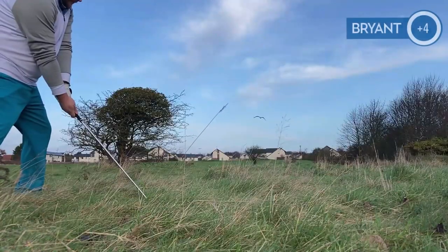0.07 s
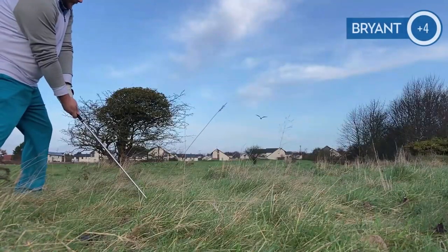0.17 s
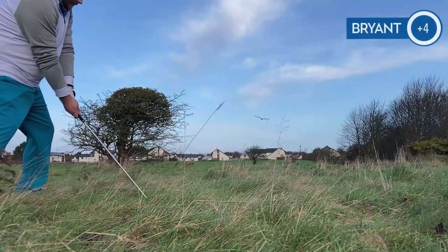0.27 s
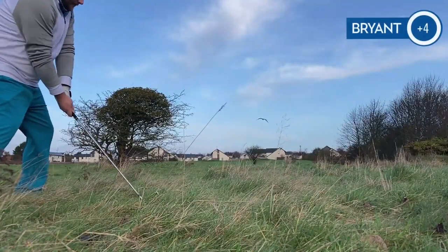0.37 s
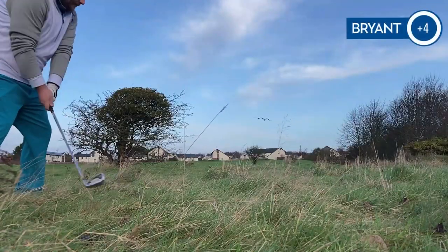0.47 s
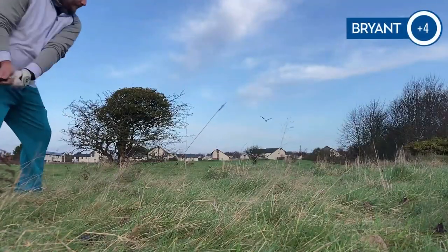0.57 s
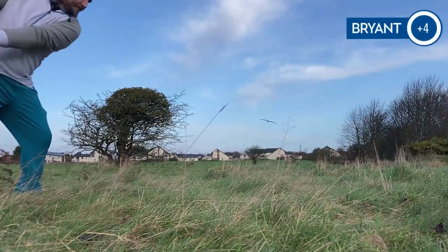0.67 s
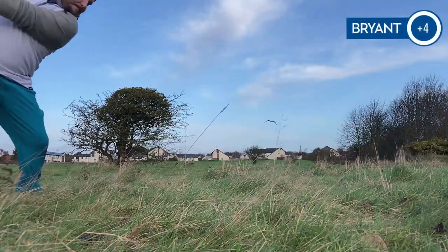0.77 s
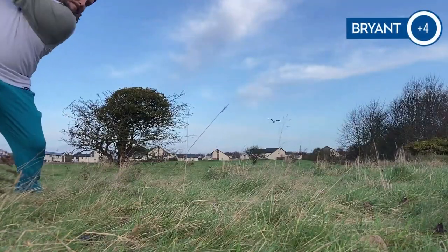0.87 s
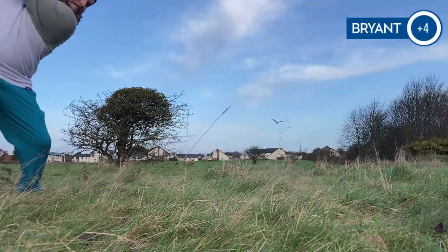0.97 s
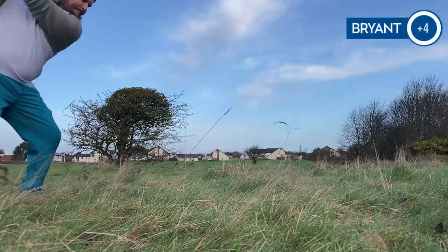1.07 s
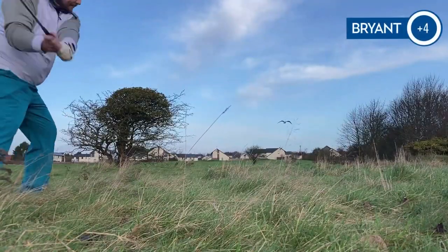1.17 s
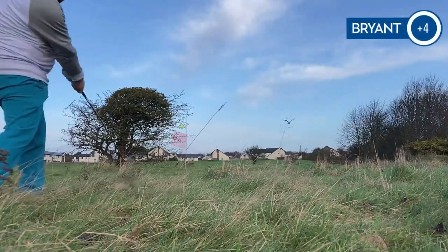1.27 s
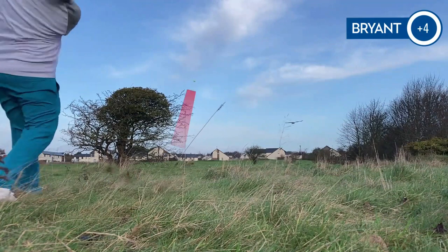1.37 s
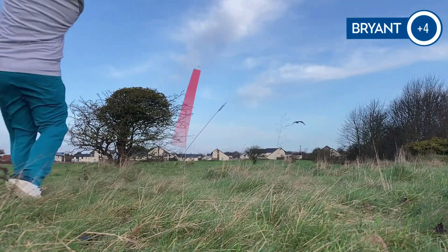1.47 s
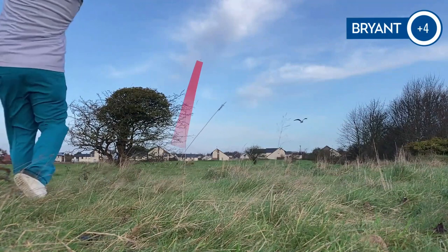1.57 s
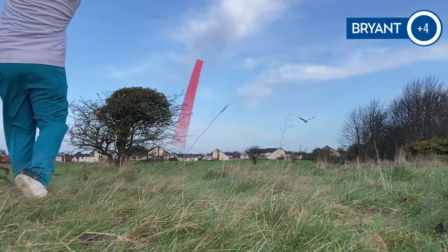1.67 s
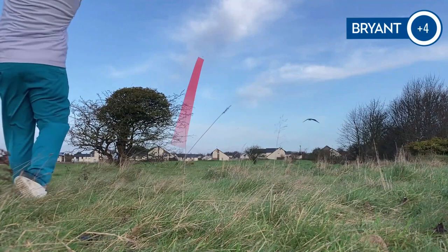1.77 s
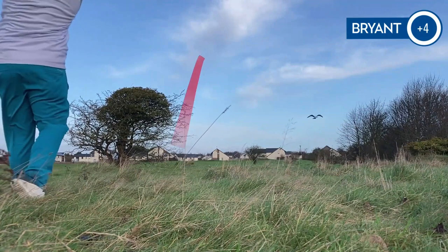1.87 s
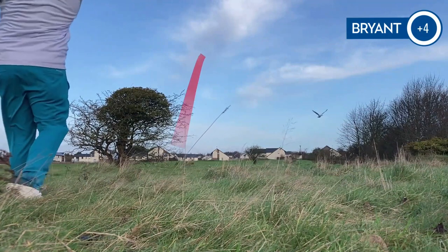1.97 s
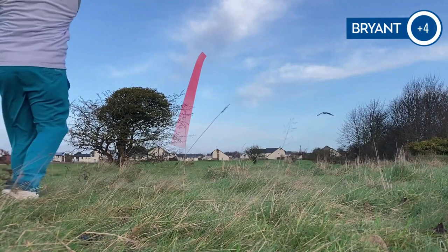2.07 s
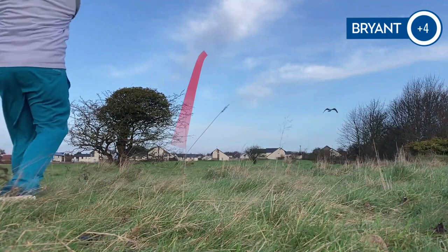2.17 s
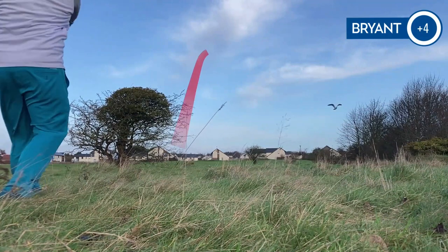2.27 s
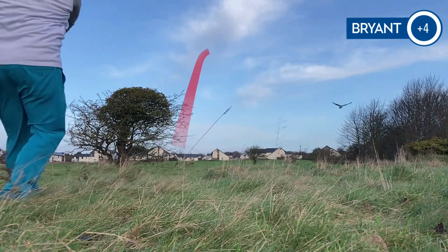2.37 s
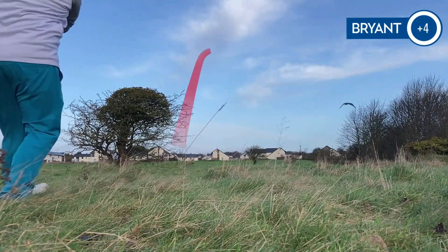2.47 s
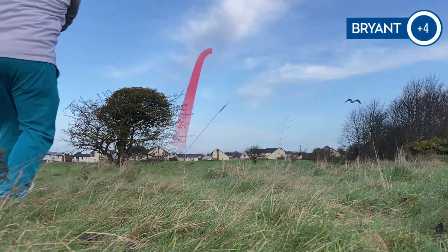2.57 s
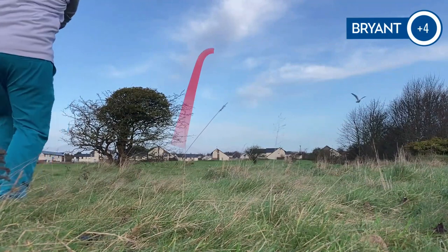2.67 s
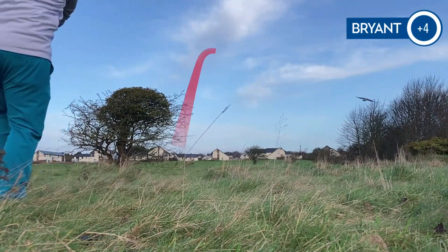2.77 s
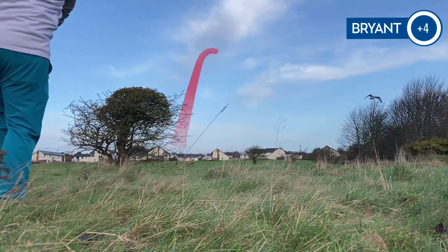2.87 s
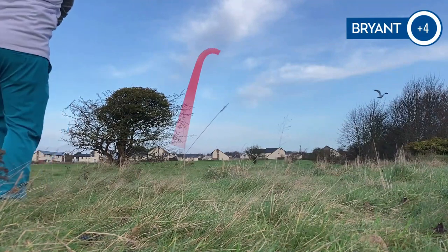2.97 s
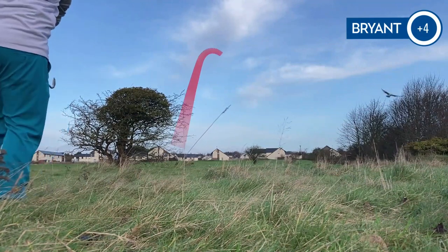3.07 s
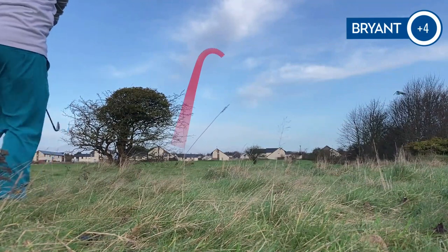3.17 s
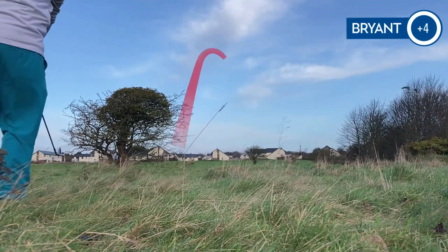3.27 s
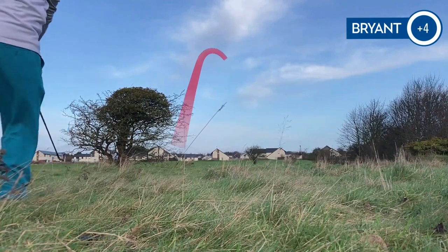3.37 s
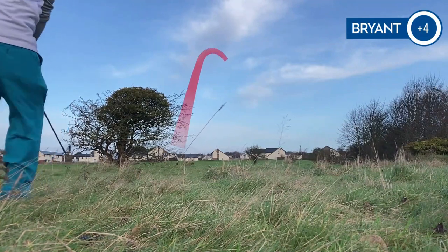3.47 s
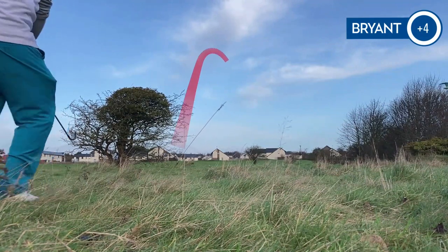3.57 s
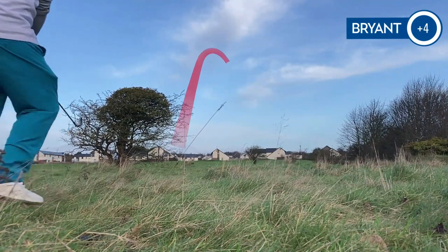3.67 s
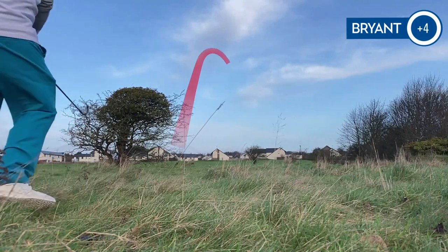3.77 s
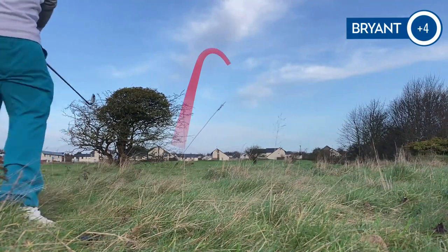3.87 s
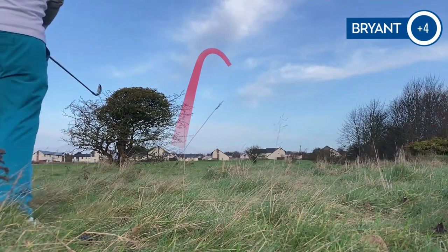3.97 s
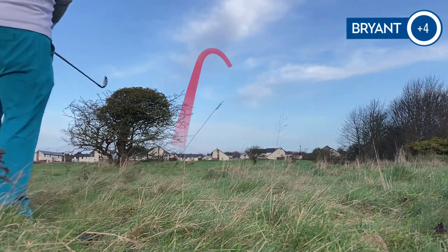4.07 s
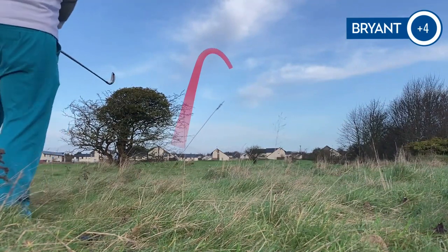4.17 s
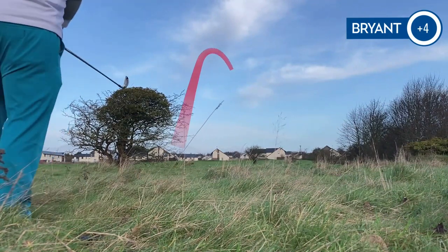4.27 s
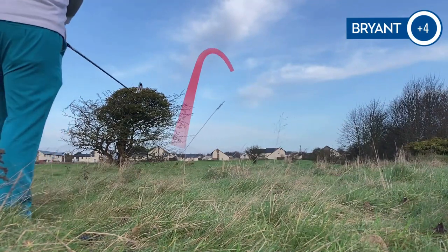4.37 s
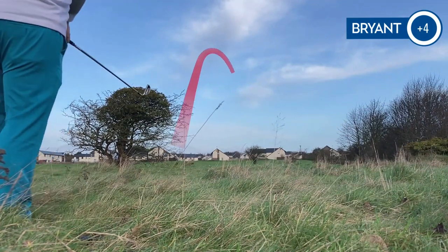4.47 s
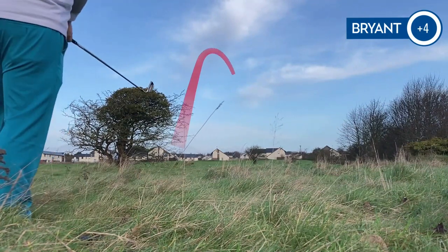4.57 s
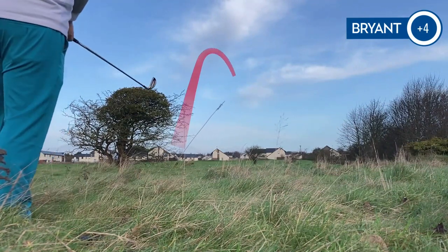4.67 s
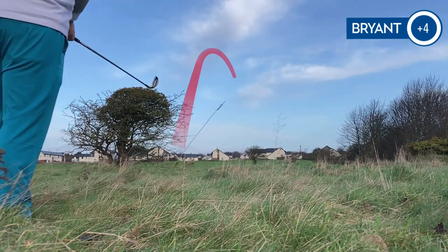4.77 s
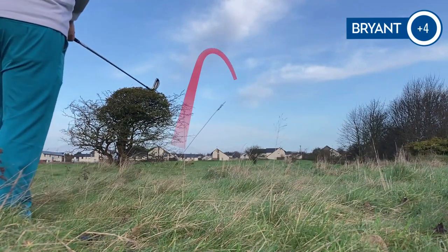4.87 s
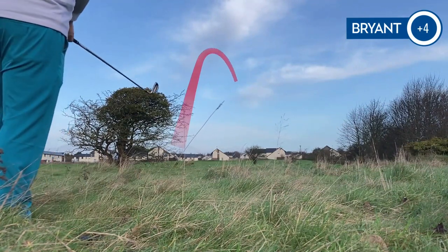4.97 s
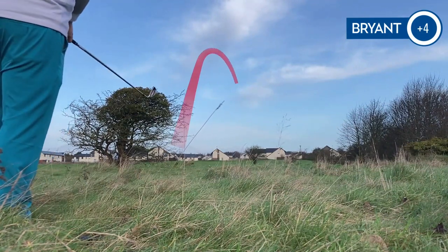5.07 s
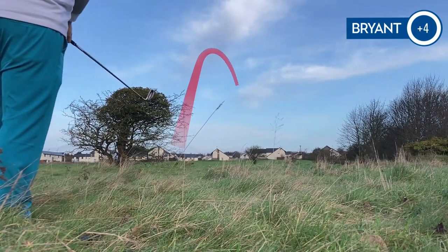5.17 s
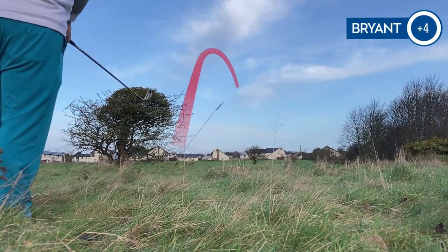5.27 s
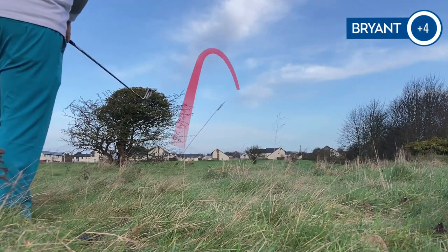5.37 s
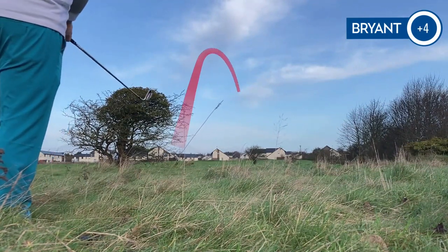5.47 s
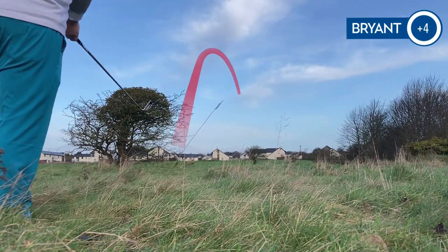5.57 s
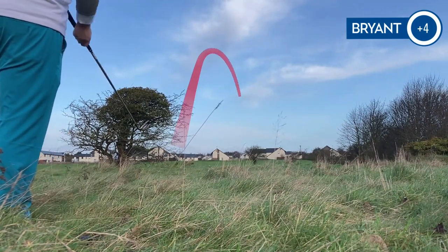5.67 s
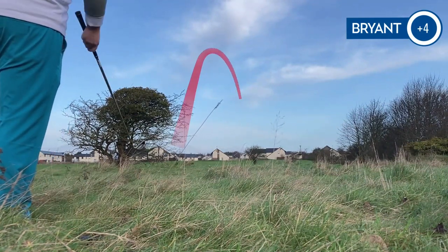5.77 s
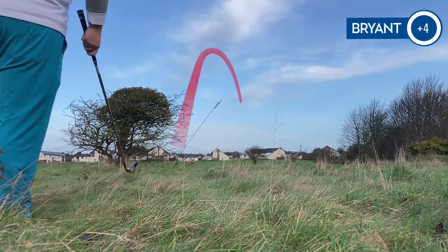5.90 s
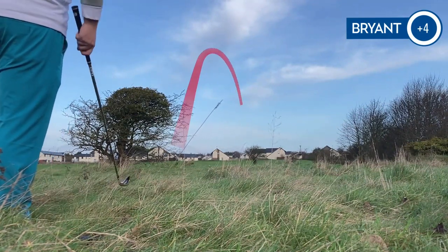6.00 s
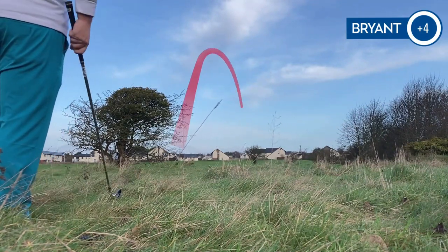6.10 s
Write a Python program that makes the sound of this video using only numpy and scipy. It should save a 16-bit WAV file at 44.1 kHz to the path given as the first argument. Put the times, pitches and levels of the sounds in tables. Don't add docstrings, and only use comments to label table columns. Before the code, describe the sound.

A golf iron whooshes through long grass and clicks sharply against a ball at one second, while gusty wind rumbles and flutters on the microphone.

```python
import sys
import numpy as np
from scipy import signal
from scipy.fft import rfft, irfft, next_fast_len
from scipy.io import wavfile
from scipy.ndimage import uniform_filter1d

SR = 44100
rng = np.random.default_rng(int(sys.argv[2]) if len(sys.argv) > 2 else 0)


def linear_from_db(decibels):
    return 10 ** (np.asarray(decibels, float) / 20)


def inscribe(sig):
    pcm = np.round(np.clip(np.atleast_2d(sig).T, -1, 1) * 32767)
    wavfile.write(sys.argv[1], SR, pcm.astype(np.int16))


N = 270553

# peak in seconds, level in dB,
# rise in seconds per 20 dB, fall in seconds per 20 dB.
CUTS = [
    (1.035, -31, .045, .001),
    (1.0377, -5, .0012, .004),
    (1.0402, -9, .003, 0.01),
    (1.0459, -4.5, .002, 0.007),
    (1.0516, -18, .004, 0.013),
    (1.069, -26.5, 0.06, .003),
]
# frequency in Hz, density in dB per Hz.
CUT_SPECTRUM = [(600, -18), (1200, -13), (2500, -13), (4700, -7), (6300, -13.5), (8000, -5.5), (10500, 0.5),
                (13000, -5.5), (15800, 5)]
# time in seconds, level in dB.
WHOOSH = [
    (.96, -52),
    (.995, -43),
    (1.005, -34),
    (1.014, -39.5),
    (1.023, -34.5),
    (1.036, -34),
    (1.045, -60),
]
WHOOSH_HZ, WHOOSH_WIDTH_HZ = 580, 100
# centre in Hz, width in Hz, level in dB against the whoosh.
WAKE = [
    (1150, 500, -9),
    (4300, 2500, -21),
]
# start in seconds, pitch in Hz, height signed by push or pull,
# decay by 60 dB in seconds.
BLOWS = [
    (1.0387, 322, .3, .04),
    (1.042, 310, .5, .02),
    (1.0496, 300, -.3, .012),
    (1.051, 150, .5, .03),
    (1.0576, 75, -.22, .1),
]
BALL_S = 1.0466
# pitch in Hz, level in dB, decay by 60 dB in seconds.
BALL_MODES = [(450, -12, .02), (580, -9, 0.028), (690, -18, 0.0248), (800, -18, .02), (880, -15, .025),
              (1100, -19, .02), (1400, -19, .015), (1520, -12, 0.014), (2080, -18, .018),
              (2550, -12, 0.015), (4080, -8, .015), (4750, -5, 0.016)]

# peak in seconds, level in dB,
# rise in seconds per 20 dB, fall in seconds per 20 dB, level of the duller swish in dB.
DRAGS = [(0.213, -56.0, 0.076, 0.075, -10.5), (0.275, -51.5, 0.016, 0.113, -10.5),
         (0.297, -64.5, 0.087, 0.059, -7.5), (0.439, -70.5, 0.229, 0.254, -4.5),
         (0.553, -69.0, 0.072, 0.112, -1.0), (0.723, -74.5, 0.529, 0.07, -9.5),
         (0.938, -75.0, 0.111, 0.199, -3.0), (1.098, -57.5, 0.05, 0.214, 0.0),
         (1.222, -53.0, 0.327, 0.055, -3.5), (1.303, -64.5, 0.025, 0.226, -3.0),
         (1.523, -74.5, 0.362, 0.112, -8.0), (2.032, -78.5, 0.072, 0.573, -16.0),
         (2.19, -73.5, 0.66, 0.088, -8.5), (2.383, -82.5, 0.089, 0.905, -15.5),
         (2.612, -64.0, 0.088, 0.454, -14.5), (2.732, -53.0, 0.097, 0.192, -8.5),
         (2.829, -60.0, 0.181, 0.072, -10.5), (2.922, -68.0, 0.101, 0.341, -12.5),
         (3.401, -54.5, 0.149, 0.078, -5.0), (3.495, -60.5, 0.195, 0.075, -6.0),
         (3.677, -61.0, 0.133, 0.283, -6.0), (3.953, -70.0, 0.492, 0.078, -17.5),
         (4.05, -70.0, 0.091, 0.117, -4.0), (4.327, -72.5, 1.982, 0.146, -21.5)]
# peak in seconds, level in dB, rise and fall in seconds per 20 dB,
# level of the duller swish in dB.
LAST_STEP = (6.053, -67, .123, .21, -12)
STIR_DB = -90
# start in seconds, peak in dB.
SNAPS = [(0.188, -49.5), (0.1994, -40), (0.26, -44), (0.2662, -43.5), (0.2768, -39.5), (0.3205, -37),
         (0.3239, -35), (0.3444, -45), (0.5331, -40), (0.579, -48), (1.3612, -42), (2.7071, -37),
         (3.1067, -52), (3.262, -53), (3.458, -39), (4.2666, -58), (4.527, -64)]
# frequency in Hz, density in dB per Hz.
GRASS_SPECTRUM = [(2500, -20), (4000, -11.5), (5500, -12), (7300, -7), (9000, -7.5), (11000, -2),
                  (12500, -0.5), (14000, -2), (15700, 4)]

# time in seconds, rumble in dB.
WIND = [(0.0, -37.5), (0.448, -39.5), (1.001, -33.5), (1.585, -25.0), (2.328, -46.0), (2.45, -35.5),
        (3.088, -40.0), (3.697, -35.5), (4.116, -39.5), (4.5, -39.0), (5.088, -58.0), (5.589, -38.0),
        (6.131, -41.5)]
# peak in seconds, level in dB, half length in seconds.
GUSTS = [(0.054, -29.0, 0.08), (0.304, -29.5, 0.109), (0.405, -24.0, 0.027), (0.796, -26.5, 0.029),
         (0.923, -28.0, 0.046), (1.038, -29.0, 0.024), (1.172, -23.5, 0.05), (1.266, -23.0, 0.042),
         (1.482, -20.5, 0.026), (1.709, -18.0, 0.028), (1.9, -25.5, 0.03), (2.002, -23.5, 0.069),
         (2.109, -27.5, 0.062), (2.201, -21.5, 0.036), (2.264, -25.5, 0.043), (2.425, -33.0, 0.036),
         (2.631, -24.5, 0.022), (2.835, -25.0, 0.032), (3.016, -24.5, 0.024), (3.212, -20.0, 0.02),
         (3.482, -27.5, 0.025), (3.608, -30.5, 0.04), (4.284, -23.5, 0.027), (4.617, -30.0, 0.023),
         (4.797, -37.0, 0.093), (4.986, -36.0, 0.131), (5.155, -34.5, 0.031), (5.388, -30.0, 0.143),
         (5.537, -33.5, 0.062), (6.103, -32.0, 0.025)]
GUST_EDGE_DB = 12
# frequency in Hz, density in dB per Hz.
RUMBLE_SPECTRUM = [(22, -28), (40, -7.5), (62, 0), (95, -5.5), (140, -13), (200, -26.5)]
# frequency in Hz, density in dB per Hz.
FLUTTER_SPECTRUM = [(90, -11), (140, -1), (220, -1), (320, -7), (480, -17.5), (700, -30.5), (1000, -47)]
FLUTTER_DB, FLUTTER_FOLLOWS, FLUTTER_SMOOTH_S = -43, .15, .3
# time in seconds, left over right flutter in dB, gain across the port edges in dB.
VEER = [(0.0, -4.5, -0.5), (0.23, -5.0, 2.5), (0.33, -5.0, -3.0), (0.62, -6.0, 0.5), (0.92, 1.0, 0.5),
        (1.39, -0.5, -4.0), (1.7, -0.5, -1.5), (2.13, 0.0, 3.0), (2.54, -3.5, -3.5), (2.83, -2.0, 1.0),
        (3.1, -4.5, 0.0), (3.5, -8.5, -2.5), (4.09, -6.0, 0.0), (4.4, -10.5, -0.5), (4.69, -8.0, 0.5),
        (5.21, -5.5, 0.5), (5.59, -7.0, 0.0), (6.13, -3.0, 1.0)]
GUST_EVENS = .2
# start in seconds, peak in dB, pitch in Hz, left over right in dB.
BUFFETS = [(0.074, -22.5, 143, -5.5), (0.21, -21, 143, -5), (1.215, -29, 143, 5), (1.384, -34, 153, 3.0),
           (1.626, -21.5, 234, 1.0), (1.633, -27, 420, 0), (1.6415, -21, 170, 0), (1.885, -30, 212.6, 2),
           (1.993, -23.5, 172, 2), (2.235, -24, 144, -1), (2.802, -27, 143, 0), (2.839, -33, 163, 0.5),
           (3.134, -31, 143, -1.5), (3.384, -32, 226, -6.5), (3.57, -31, 144, -1.5)]

# time in seconds, tyre hiss in dB, half length in seconds, roar in dB.
CARS = [
    (0.47, -72.0, 0.94, -52.0),
    (1.17, -66.0, 0.23, -51.5),
    (1.76, -68.5, 0.65, -50.5),
    (2.4, -61.5, 0.15, -52.0),
    (2.71, -63.0, 0.82, -52.5),
    (3.36, -70.0, 0.42, -51.5),
    (4.31, -64.5, 0.51, -50.0),
    (4.87, -65.0, 0.24, -51.5),
    (6.2, -68.0, 1.5, -49.5),
]
ROAD_HISS_DB, ROAR_DB = -72, -52
# frequency in Hz, density in dB per Hz.
ROAR_SPECTRUM = [(450, -16.5), (650, -11.5), (900, -1), (1100, 0), (1400, 0), (1800, -0.5), (2500, -9.5),
                 (3200, -24.5)]
# frequency in Hz, density in dB per Hz.
TYRES_SPECTRUM = [(2200, -3), (3000, 0.5), (4000, -6), (5000, -13.5), (7000, -26), (10000, -24.5),
                  (15700, -23)]

# frequency in Hz, phase in radians.
NEAR_PORTS = [(0, 0), (1000, 0.73), (3500, 2), (5500, 2), (7000, 0.5), (8700, -2.5), (9550, -3.5),
              (11500, -6.5), (13400, -9), (13800, -9.5), (15800, -11.5), (22050, -21)]
# frequency in Hz, phase in radians.
FAR_PORTS = [(0, 0), (1200, -3), (2500, -6.5), (3900, -8), (5000, -5.5), (7000, -5), (8850, -9.5),
             (9450, -9.5), (11500, -12.5), (13400, -16), (13800, -16), (15800, -19), (22050, -28)]
# frequency in Hz, likeness from 0 to 1.
NEAR_ALIKE = [(100, 0.92), (2000, .9), (4500, 0.91), (7000, 1), (8500, 0.97), (16000, 0.91)]
# frequency in Hz, likeness from 0 to 1.
FAR_ALIKE = [(400, 0.55), (1200, .45), (3500, .4), (6000, 0.18), (8500, 0.96)]


def strike():
    tear = np.sqrt(strokes(CUTS, size=4)) * coloured(stalks(9000.0, 3.0, hiss=1.0), CUT_SPECTRUM)
    eddies = rng.standard_normal((2, N))
    air = 0
    for hz, width_hz, level_db in [(WHOOSH_HZ, WHOOSH_WIDTH_HZ, 0), *WAKE]:
        t60 = np.log(1000) / np.pi / width_hz
        air = air + linear_from_db(level_db) * rms_one(ring(eddies, hz, t60))
    whoosh = linear_from_db(in_time(WHOOSH, -200)[0]) * air
    thud = sum(ring(clicks_at([s], height), hz, t60) for s, hz, height, t60 in BLOWS)
    soft_thud = signal.lfilter([.15], [1, -.85], thud)
    click = sum(ring(clicks_at([BALL_S], linear_from_db(level_db)), hz, t60) for hz, level_db, t60 in BALL_MODES)
    return tear + whoosh + (soft_thud + click) * [[1], [0]]


def grass():
    brush = coloured(stalks(3500.0, 3.5, hiss=.9), GRASS_SPECTRUM)
    dull = signal.sosfiltfilt(signal.butter(4, 8800, fs=SR, output="sos"), brush)
    drags = [*DRAGS, LAST_STEP]
    bright_rows = [row[:4] for row in drags]
    dull_rows = [(s, db + dull_db + 6.0, rise, fall) for s, db, rise, fall, dull_db in drags]
    bright_gain = np.sqrt(linear_from_db(2 * STIR_DB) + strokes(bright_rows, size=64))
    dull_gain = np.sqrt(linear_from_db(2 * STIR_DB) + strokes(dull_rows, size=64))
    flicker = linear_from_db(5.0 + 1.3 * drift(30.0))
    brushing = flicker * (bright_gain * (brush - dull) + dull_gain * dull)

    s, peak_db = np.transpose(SNAPS)
    crackle_decay = linear_from_db(-60 / (0.0082 * SR))
    fall = signal.lfilter([1], [1, -crackle_decay], clicks_at(s, linear_from_db(peak_db - 1.5)))
    snaps = fall * coloured(np.sign(rng.standard_normal((2, N))), GRASS_SPECTRUM)
    return brushing + snaps


def wind():
    gusty = np.sqrt(linear_from_db(2 * in_time(WIND)[0]) + swells(GUSTS, GUST_EDGE_DB))
    force_db = 20 * np.log10(gusty) + 36
    slow_db = uniform_filter1d(force_db, int(FLUTTER_SMOOTH_S * SR))
    veer_db, edge_db = in_time(VEER)
    pan_db = veer_db + GUST_EVENS * (force_db - slow_db)
    rumble = gusty * turbulence(RUMBLE_SPECTRUM, alike=.7, lumpy_db=1.5, rate=9.0)
    flutter_gain = linear_from_db(FLUTTER_DB + FLUTTER_FOLLOWS * slow_db + edge_db + 2.5)
    flutter = flutter_gain * turbulence(FLUTTER_SPECTRUM, alike=0.5, lumpy_db=2.5, rate=18.0)
    out = rumble + flutter * linear_from_db(np.outer([.5, -.5], pan_db))
    soften = signal.butter(2, 600, fs=SR, output="sos")
    for s, peak_db, hz, side_db in BUFFETS:
        burst = ring(clicks_at([s], linear_from_db(peak_db + 3.5)), hz, 4.3 / hz)
        push = signal.sosfilt(soften, burst)
        out += np.outer(linear_from_db([side_db / 2, -side_db / 2]), push)
    return out


def road():
    hiss_swells = swells([(s, hiss_db, half) for s, hiss_db, half, _ in CARS], 9.0)
    roar_swells = swells([(s, roar_db, half) for s, _, half, roar_db in CARS], 9.0)
    near_hiss = np.sqrt(linear_from_db(2 * ROAD_HISS_DB) + hiss_swells)
    near_roar = np.sqrt(linear_from_db(2 * ROAR_DB) + roar_swells)
    roar = near_roar * linear_from_db(4.5 + .8 * drift(4.3)) * coloured(rng.standard_normal((2, N)), ROAR_SPECTRUM)
    hiss = near_hiss * linear_from_db(4.5 + 1.1 * drift(5.0)) * coloured(rng.standard_normal((2, N)), TYRES_SPECTRUM)
    return ports(roar + hiss, FAR_PORTS, FAR_ALIKE)


def stalks(per_s, spread_db, hiss):
    signs = rng.choice([-1, 1], (2, N))
    sizes = signs * linear_from_db(spread_db * np.minimum(rng.exponential(1, (2, N)), 5))
    grains = sizes * (rng.random((2, N)) < per_s / SR)
    return rms_one(grains) + hiss * rng.standard_normal((2, N))


def turbulence(spectrum, alike, lumpy_db, rate):
    lumps = linear_from_db([lumpy_db * drift(rate), lumpy_db * drift(rate)])
    mid, side = coloured(rng.standard_normal((2, N)) * lumps, spectrum)
    mid = rms_one(mid / uniform_filter1d(mid ** 2, size=3000) ** .18)
    return rms_one(np.sqrt(1 + alike) * mid + np.sqrt(1 - alike) * side * [[1], [-1]])


def ports(pair, phases, alike):
    size = next_fast_len(N + 4096)
    hz = np.maximum(np.arange(size // 2 + 1) * SR / size, 1)
    same = np.clip(at_hz(alike, hz), 0, 1)
    common, own = rfft(pair, size)
    lead = np.exp(1j * np.interp(hz, *np.transpose(phases)))
    left = (same * common + np.sqrt(1 - same ** 2) * own) * lead
    return np.array([irfft(left, size)[:N], pair[0]])


def ring(clicks, hz, t60):
    r, w = linear_from_db(-60 / (t60 * SR)), 2 * np.pi * hz / SR
    return signal.lfilter([0, np.sin(w)], [1, -2 * r * np.cos(w), r * r], clicks + 1e-18)


def clicks_at(times, heights):
    train = np.zeros(N)
    train[np.round(np.asarray(times) * SR).astype(int)] = heights
    return train


def strokes(rows, size):
    t = np.arange(0, N, size) / SR
    power = 0
    for s, db, rise, fall in rows:
        away = np.maximum((s - t) / rise, (t - s) / fall)
        power = power + linear_from_db(2 * db - 2 * 20 * away)
    return np.interp(np.arange(N) / SR, t, power)


def swells(rows, edge_db):
    t = np.arange(0, N, 64) / SR
    s, db, half = np.transpose(rows)[:, :, None]
    heights = linear_from_db(db - edge_db * ((t - s) / half) ** 2)
    return np.interp(np.arange(N) / SR, t, (heights ** 2).sum(axis=0))


def drift(rate):
    r = np.exp(-80 * np.pi * rate / SR)
    slow = signal.lfilter([1], [1, -2 * r, r * r], rng.standard_normal(N // 40 + 2002))[2000:]
    return np.interp(np.arange(N) / 40, np.arange(len(slow)), rms_one(slow))


def coloured(x, spectrum):
    size = next_fast_len(N)
    hz = np.maximum(np.arange(size // 2 + 1) * SR / size, 1)
    closed = [(spectrum[0][0] / 4, -120), *spectrum, (spectrum[-1][0] * 1.04, -160)]
    return rms_one(irfft(rfft(x, size) * linear_from_db(at_hz(closed, hz)), size)[..., :N])


def at_hz(points, hz):
    points_hz, values = np.array(points)[:, 0], np.array(points)[:, 1]
    return np.interp(np.log(hz), np.log(points_hz), values)


def in_time(rows, outside=None):
    s, *columns = np.transpose(rows)
    return [np.interp(np.arange(N) / SR, s, c, outside, outside) for c in columns]


def rms_one(x):
    return x / np.sqrt(np.mean(x ** 2) + 1e-20)


def scene():
    return ports(strike() + grass(), NEAR_PORTS, NEAR_ALIKE) + road() + wind()


def low_pass(x):
    return signal.sosfilt(signal.butter(12, 16420, fs=SR, output="sos"), x)


def record(dry):
    railed = np.clip(dry, -1.05, 1.05)
    mix = signal.sosfilt(signal.cheby2(12, 70, 17100, fs=SR, output="sos"), railed)
    return low_pass(mix)


dry = scene()
out = record(dry)
inscribe(out)
```